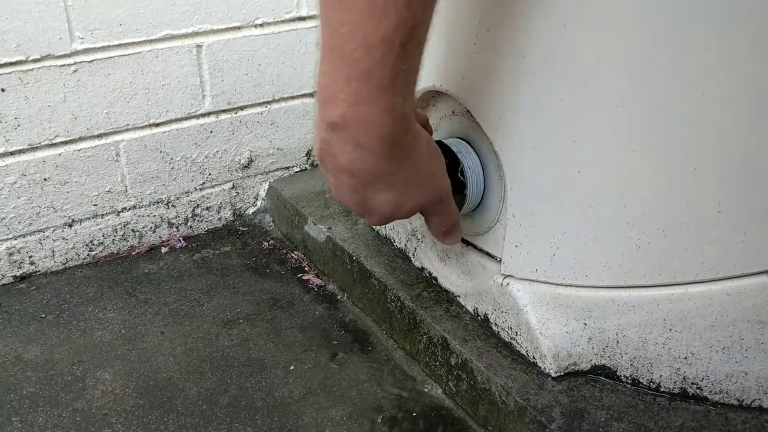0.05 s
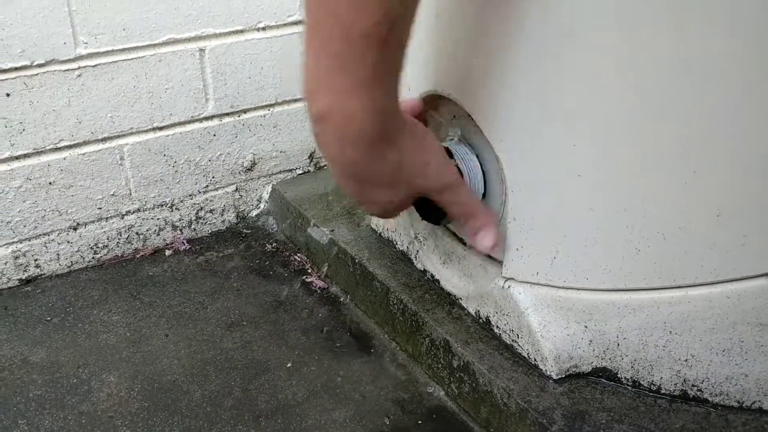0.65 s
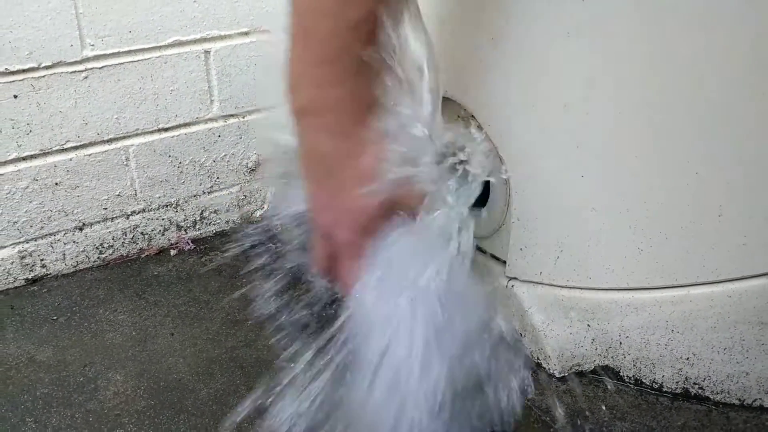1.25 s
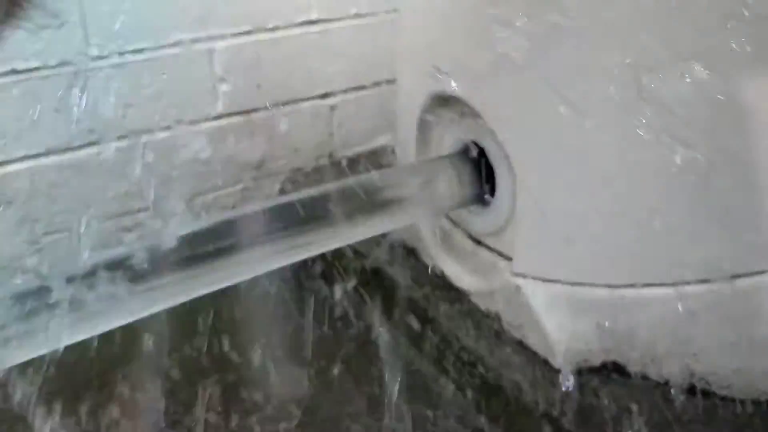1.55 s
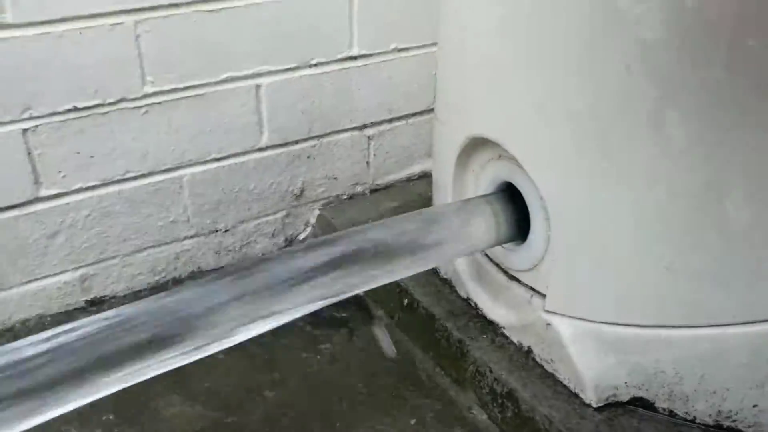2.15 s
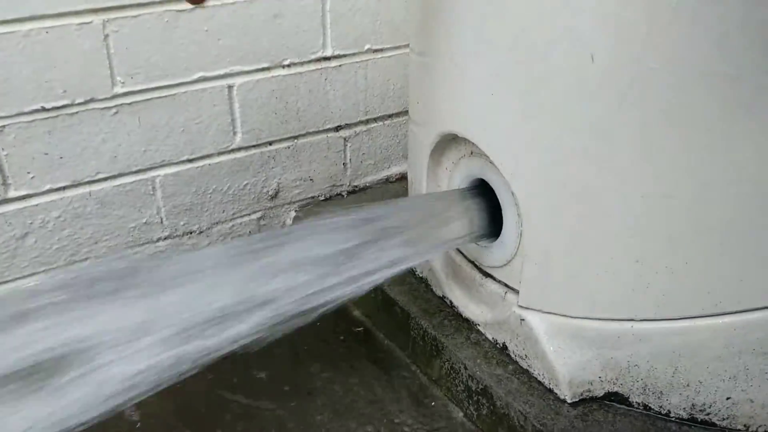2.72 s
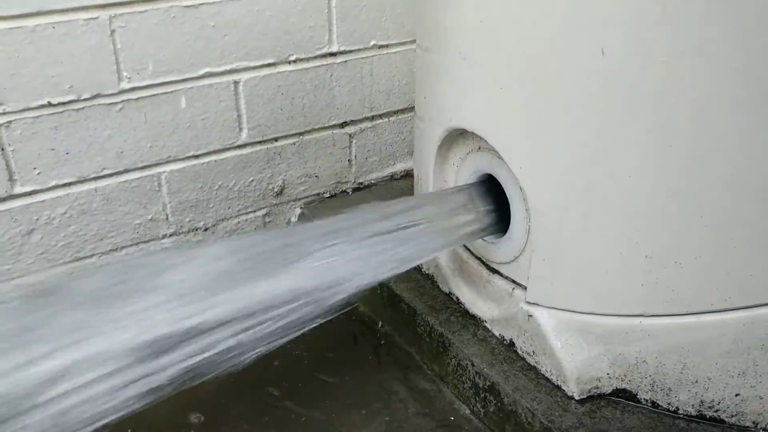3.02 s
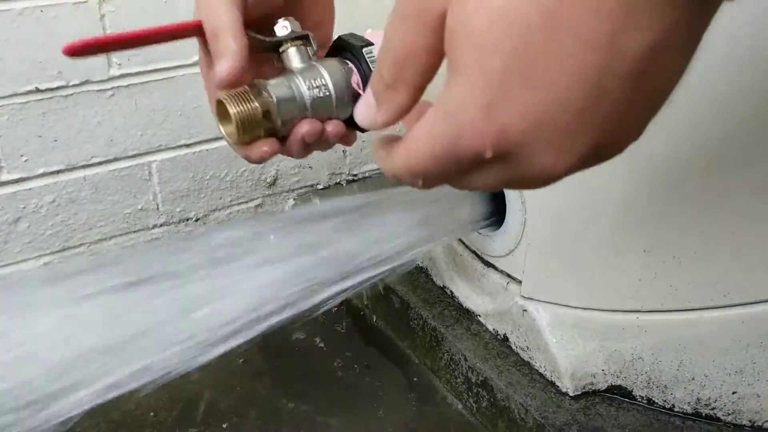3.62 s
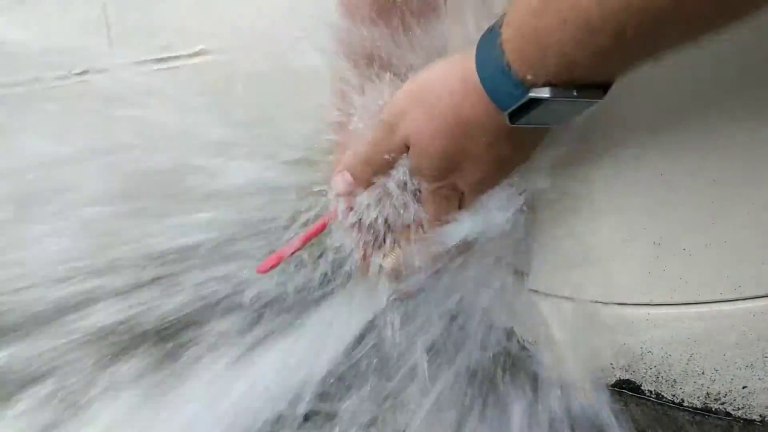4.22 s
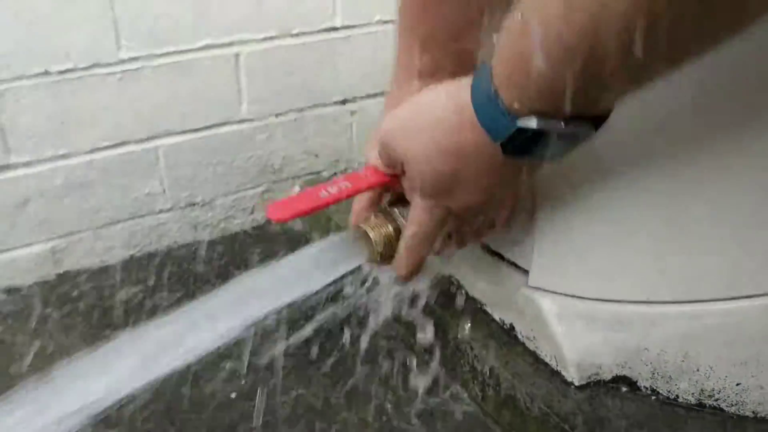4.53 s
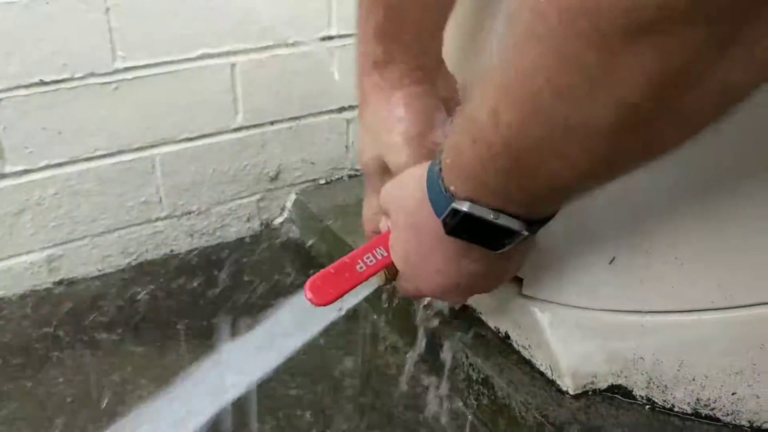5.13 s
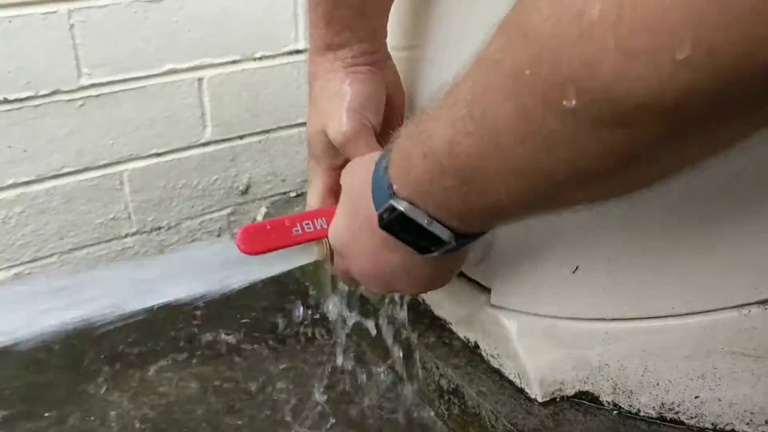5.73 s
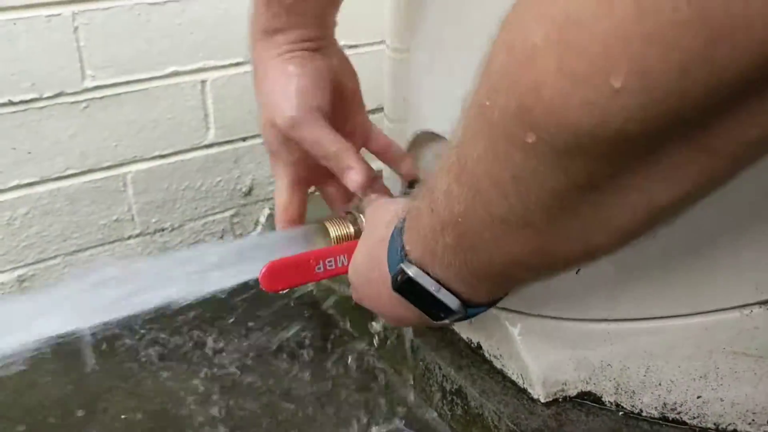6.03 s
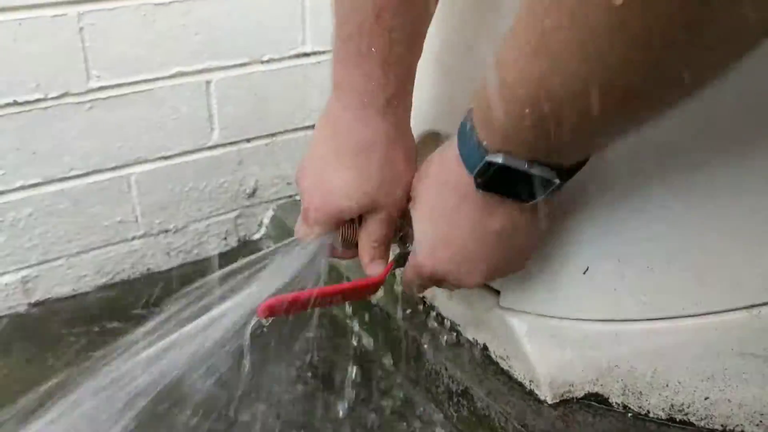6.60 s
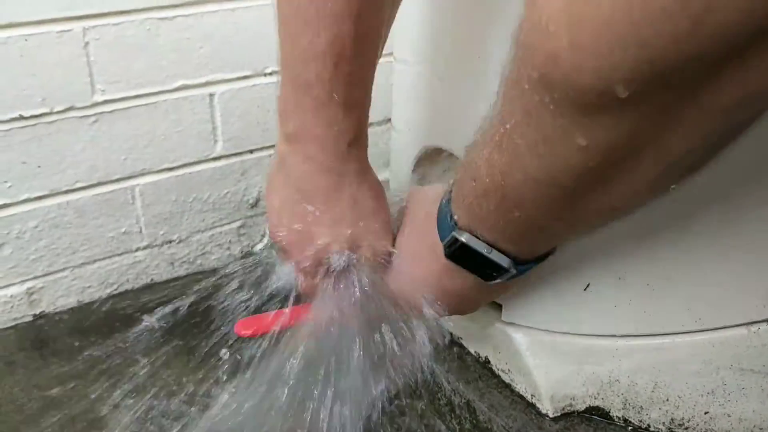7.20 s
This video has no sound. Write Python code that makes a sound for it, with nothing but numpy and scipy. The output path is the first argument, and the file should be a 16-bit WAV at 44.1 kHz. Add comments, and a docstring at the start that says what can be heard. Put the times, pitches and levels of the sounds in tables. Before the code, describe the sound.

The sound is outdoors, with the microphone close to a water tank's outlet and a faint rumble and hum behind. In the first half second a wet plastic plug gives a few small creaks, and thin squirts and sputtering hisses leak around it. At about 1.2 seconds it lets go in a bright burst of spray. Around 1.4 seconds water hits the microphone in a cluster of loud, thudding slaps, and everything afterwards sounds muffled and hollow. From 1.5 seconds a jet pounds wet concrete, growing stronger at about 2.3 seconds, with bubbling, fat nearby splats and occasional low gulps. Just after 4 seconds a valve pushed into the jet causes a strong surge of spray and deep gulping. The flow continues unevenly and gradually weakens, with spattering surges at about 6.2, 6.5, 6.9 and 7.2 seconds and a faint misty hiss.

```python
"""Outdoors at a full water tank, microphone close to the plug. The plug creaks and leaks as it is
unscrewed, and at 1.2 s lets go in a burst of spray. Around 1.4 s water slaps the microphone and
fills its port, so the water sounds muffled and hollow from there on. From 1.5 s the jet pounds wet
concrete, with low gulps and fat splats; from about 4 s a valve pushed into it breaks it into spray."""
import sys
import numpy as np
from scipy import signal
from scipy.fft import rfft, irfft
from scipy.io import wavfile

SR = 44100
rng = np.random.default_rng(int(sys.argv[2]) if len(sys.argv) > 2 else 0)


def transcribe(u):
    """Save the signal u as a 16-bit wav file named by the first command-line argument.

    u: samples, shape (n,) or (channels, n), limited to [-1, 1]; the rate is SR.
    q: integer samples, one column per channel.
    """
    v = np.clip(np.atleast_2d(u).T, -1, 1)
    q = np.round(v * 32767).astype(np.int16)
    wavfile.write(sys.argv[1], SR, q)


N = 320166
TIME = np.arange(N) / SR
HZ = np.fft.rfftfreq(4096, 1 / SR)  # the filter grid


# The jet runs clear, frays into a white gush, then is throttled by the valve:
# (time [s], pounding level [dB], plunge re pounding [dB], spatter re pounding [dB])
JET_FLOW = [(1.53, -37, -5.5, -7.5), (1.8, -34.5, -1, -8.5), (2.231, -35, -5, -8.5), (2.29, -23, -8, -16),
            (2.5, -23, -6.5, -16.5), (2.75, -26.5, -0.5, -12.5), (3.5, -25.5, 0.5, -12),
            (4.04, -24, -4, -15), (4.35, -22.5, -6.5, -11.5), (4.549, -29, -6.5, -7.5),
            (5.0, -22, -12, -12), (5.65, -29.5, -11.5, -9), (6.05, -30.5, -11, -9), (6.4, -37, -7.5, -7.5),
            (6.65, -35.5, -8.5, -4.5), (7.151, -39.5, -3.5, -5)]
# It surges or is briefly blocked: (start [s], length [s], change of pounding [dB], plunge [dB],
# spatter [dB])
JET_SURGES = [(2.3, 0.051, 0.5, 9.5, -2.5), (2.498, 0.069, 1.5, 5.5, 0.5), (3.58, 0.1, 3.5, -0.5, -0.5),
              (4.054, 0.217, 5, 4.5, 6.5), (5.034, 0.12, -4, -3, -0.5), (5.264, 0.064, -4.5, -3, -0.5),
              (5.746, 0.11, -7.5, -12, -1.5), (6.162, 0.11, 3.5, 4, 6.5), (6.451, 0.1, 1, 15.5, 7.5),
              (6.867, 0.078, 5.5, 6.5, 3), (7.178, .12, 4.5, 7, 9)]
# Its three voices out on the concrete, ahead of the port: (frequency [Hz], level [dB])
PLUNGE_SPECTRUM = [(40, -54), (120, -17), (220, -7.5), (350, -5), (600, 3.5), (950, 6.5), (1150, -9.5),
                   (1600, -28.5), (4000, -52)]
POUND_SPECTRUM = [(300, -52.5), (850, -16), (1200, 5), (1900, 1.5), (2400, -6), (4000, -15), (9000, -44)]
SPATTER_SPECTRUM = [(600, -27.5), (1600, -7), (2400, 2.5), (3200, -1.5), (16000, 7)]

def jet():
    """Lumps of water land on wet concrete: a hollow plunge, hard pounding, bubbles and fine spatter."""
    pound_db, plunge_db, spatter_db = curves(JET_FLOW)
    plunge_db, spatter_db = pound_db + plunge_db, pound_db + spatter_db
    for start, length, harder_db, deeper_db, finer_db in JET_SURGES:
        surge = gate(start, start + length, fade=0.015)
        pound_db += harder_db * surge
        plunge_db += deeper_db * surge
        spatter_db += finer_db * surge
    port = flooded_port()
    lumps = np.minimum(wander(hz=55), 1.5)  # all three voices swell together
    plunge_hits = drops(per_s=1500, spread_db=3.2, wash=0.4) * amp(1.2 * lumps + 1.5 * wander(hz=30))
    plunge = unit_rms(colour(plunge_hits, spectrum(PLUNGE_SPECTRUM) + port))
    pound_hits = drops(per_s=1600, spread_db=3, wash=0.71) * amp(2.2 * lumps)
    pound = unit_rms(colour(pound_hits, spectrum(POUND_SPECTRUM) + port))
    gurgle = unit_rms(colour(bubbles(per_s=420, low_hz=819, high_hz=2017), port))
    spatter_hits = drops(per_s=2200, spread_db=1, wash=0.99) * amp(1.5 * lumps)
    spatter = unit_rms(colour(spatter_hits, spectrum(SPATTER_SPECTRUM) + port))
    tinkle = unit_rms(colour(bubbles(per_s=160, low_hz=1787, high_hz=5900), port))
    coarse = 0.86 * pound + amp(-8) * gurgle
    fine = 0.85 * spatter + 0.5 * tinkle
    water = amp(pound_db) * coarse + amp(plunge_db) * plunge + amp(spatter_db) * fine
    return water * gate(1.5, 9, fade=0.036)


def bubbles(per_s, low_hz, high_hz, sizes=16):
    """Air trapped where the jet lands rings for a few cycles, barely rising in pitch."""
    out, t = np.zeros(N), TIME[:1024]
    for hz in np.geomspace(low_hz, high_hz, sizes):
        age = hz * t / 4.5  # in decay times of 4.5 cycles
        ring = np.exp(-age) * (1 - np.exp(-8 * age)) * np.sin(2 * np.pi * hz * t * (1 + 0.012 * age))
        births = rng.random(N) ** 2 * (rng.random(N) < per_s / sizes / SR)
        out += signal.oaconvolve(births, ring)[:N]
    return out


# Treble loss through the water in the port: (frequency [Hz], gain [dB])
PORT_MUFFLE = [(100, 0.5), (1600, -0.5), (2200, -4), (3000, -6.5), (3500, -11), (4000, -9.5), (4900, -12),
               (6000, -21.5), (8000, -34.5), (10000, -42.5), (15500, -55.5)]
# The port's resonances and notches: (frequency [Hz], width [Hz], gain [dB])
PORT_RESONANCES = [(920.5, 122, 8.5), (1120, 157, -9.5), (1423, 245, 12.5), (2140, 230, -2.5),
                   (2460, 65, 4.5)]

def flooded_port():
    """Water in the microphone port swallows the treble and rings at two main hollow pitches; in dB."""
    return spectrum(PORT_MUFFLE) + sum(db * bell(hz, width) for hz, width, db in PORT_RESONANCES)


# Fat splats, heard through the flooded port: (time [s], peak level [dB], centre [Hz], decay [s])
NEAR_SPLATS = [(1.706, -4.5, 1000, 0.0037), (1.764, -9, 1040, 0.0063), (1.8116, -17.5, 1710, 0.0093),
               (1.815, -19.5, 3670, 0.0075), (1.898, -17.5, 990, 0.0018), (1.965, -16, 1410, 0.0012),
               (2.264, -14, 1470, 0.0095), (2.288, -15, 1480, 0.0055), (2.431, -10, 1310, 0.0052),
               (3.546, -11, 647, 0.019), (3.621, -12, 1400, 0.012), (3.667, -8.5, 1340, 0.0083),
               (4.07, -7.5, 1400, 0.00081), (4.336, -10, 1400, 0.0046), (4.419, -21, 1400, 0.003),
               (4.454, -10.5, 960, 0.0048), (4.817, -12, 980, .0043), (4.953, -11.5, 1410, 0.0035),
               (5.059, -12.5, 1460, 0.0066), (5.09, -12, 1520, 0.007), (5.173, -14, 3040, .005),
               (5.44, -9, 1130, 0.0057), (5.455, -15, 815, 0.021), (5.573, -15.5, 1500, 0.0025),
               (5.836, -16.5, 1420, 0.0064), (5.901, -13.5, 1500, 0.0013), (6.01, -22, 930, 0.019),
               (6.485, -6, 3760, 0.00081), (6.509, -4, 1280, 0.00099), (6.5196, -7.5, 940, 0.001),
               (6.572, -19.5, 880, 0.0035)]

def splats():
    """Single splats near the microphone: short ones crack, longer ones are round plops."""
    out, port = np.zeros(N), flooded_port()
    jet_s, pound_db = np.transpose(JET_FLOW)[:2]
    stray_count, stray_hz, stray_decay_s = 10, 1400, 0.0023
    strays = []  # lesser splats fall at random and follow the force of the jet
    for when, size in rng.random((stray_count, 2)):
        s = jet_s[0] + when * (jet_s[-1] - jet_s[0])
        db = np.interp(s, jet_s, pound_db) + 11.5 + 4 * (2 * size - 1)
        strays.append((s, db, stray_hz, stray_decay_s))
    for s, db, hz, decay_s in NEAR_SPLATS + strays:
        band_db = 1.58 * hump(hz, sharpness=0.75 + 450 * decay_s)
        add(out, s, amp(db) * unit_peak(colour(impact(decay_s, scatter=0.9), band_db + port)))
    return out


# Sharp slaps of water close by: (time [s], ring level [dB], ring pitch [Hz], crack level [dB])
CLOSE_SLAPS = [(1.249, -18.5, 2890, -8.5), (1.3816, -4.5, 192, -6), (1.408, -4.5, 454, -3.5),
               (1.4117, -4, 970, -5), (1.430, -17, 1510, -3.5), (1.436, -1.5, 784, -11),
               (1.4458, -2, 125, -3), (1.453, -1.5, 776, -1), (1.460, -1.5, 720, -13),
               (1.468, -14, 390, -28), (1.474, -8.5, 101, -31), (1.4943, -3.5, 940, -13.5)]

def slaps():
    """First a splash off the hand, then water hitting the microphone; each cracks, rings and thuds."""
    flood_start_s, flood_length_s = 1.452, 0.013
    muffle, t = spectrum(PORT_MUFFLE), TIME[:8192]
    sheet = unit_rms(colour(rng.standard_normal(N), 4.9 * hump(166, sharpness=0.5) + muffle))
    out = amp(-18) * sheet * gate(1.425, 1.51, fade=0.02)  # buffeting under the later slaps
    thud = amp(-12.5 - 60 * t / 0.17) * np.sin(2 * np.pi * 55 * t)
    for s, db, hz, crack_db in CLOSE_SLAPS:
        decay_s = 0.0028 + 0.66 / hz  # low rings last longer
        ring = np.sin(2 * np.pi * hz * t) * np.exp(-t / decay_s) * (1 - np.exp(-t / 0.0004))
        filled = np.clip((s - flood_start_s) / flood_length_s, 0, 1)  # cracks dull as the port fills
        band_db = 2.15 * hump(1240, sharpness=0.94) + (0.2 + 0.8 * filled) * muffle
        crack = unit_peak(colour(impact(decay_s=0.0021, scatter=1.8), band_db))
        add(out, s, amp(db) * (ring + thud) + amp(crack_db) * crack)
    return out


# The plug lets go: (time [s], spray level [dB], splash re spray [dB])
BURST_LEVELS = [(1.168, -43, -15), (1.183, -35, -14), (1.24, -28.5, -4), (1.26, -26, 2.5),
                (1.31, -22.5, 0.5), (1.382, -19.5, -11)]
# The last turns give way and spray hits the hand: (time [s], spray boost [dB], extra splash boost [dB])
BURST_KICKS = [(1.199, 16, -10), (1.227, 16.5, 1.5), (1.247, 12, 3)]
# Spray in the air and splash off the hand: (frequency [Hz], level [dB])
SPRAY_SPECTRUM = [(1200, -4.5), (2500, -4), (5300, 3.5), (8000, -2), (13000, -1.5), (16000, -6.5)]
SPLASH_SPECTRUM = [(60, 3), (350, -17), (530, 4), (700, 1), (1100, 6), (1600, 10.5), (2300, 6.5),
                   (4000, 1.5), (9000, -48)]

def burst():
    """At close range, bright spray fans out round the plug and splashes off the hand."""
    rise_s, decay_s = 0.002, 0.0081
    spray_db, splash_db = curves(BURST_LEVELS)
    for s, spray_boost_db, splash_boost_db in BURST_KICKS:
        age = np.maximum(TIME - s, 0)
        kick = np.minimum(age / rise_s, 1) * np.exp(-age / decay_s)
        spray_db += spray_boost_db * kick
        splash_db += splash_boost_db * kick
    spray = unit_rms(colour(drops(per_s=5400, spread_db=7, wash=1.04), spectrum(SPRAY_SPECTRUM)))
    splash = unit_rms(colour(drops(per_s=3000, spread_db=2.5, wash=0.8), spectrum(SPLASH_SPECTRUM)))
    covered_db = -17 * np.clip((TIME - 1.381) / 0.0053, 0, 1)  # the first water covers the port
    level = amp(spray_db + covered_db + 0.8 * wander(hz=60)) * gate(1.165, 1.465, fade=0.0089)
    return level * (spray + amp(splash_db) * splash)


# Low gulps of air and water: (time [s], throb peak level [dB], pitch [Hz], time to fall 60 dB [s])
AIR_POCKETS = [(1.77, -31, 114, 0.12), (3.44, -21.5, 214, 0.21), (3.445, -18.5, 396, 0.089),
               (3.665, -28.5, 68, 0.1), (4.201, -24.5, 273.7, 0.42), (4.241, -16.5, 130, 0.16),
               (4.294, -19.5, 109.3, 0.29), (4.375, -31, 106, 0.38), (4.815, -22, 119, 0.025),
               (5.644, -30, 200, 0.06), (5.711, -32, 111.6, 0.24), (6.415, -28.5, 139, 0.15),
               (6.49, -31, 102, 0.14)]

def gulps():
    """Large pockets of air throb briefly at an unsteady pitch while the water churns round them."""
    out, t = np.zeros(N), TIME[:8192]
    wobble = 1 + 0.13 * wander(hz=70)
    for s, db, hz, t60 in AIR_POCKETS:
        cycles = np.cumsum(hz * wobble[round(s * SR):][:len(t)]) / SR
        throb = (1 - np.exp(-t / 0.0019)) * amp(-60 * t / t60) * np.sin(2 * np.pi * cycles)
        band_db = 2 * hump(1.52 * hz, sharpness=1.25) + spectrum(PORT_MUFFLE)
        churn = colour(impact(t60 / 7, scatter=4), band_db)
        add(out, s, amp(db) * (unit_peak(throb) + amp(-5) * unit_peak(churn)))
    return out


# The plastic plug's resonances: (frequency [Hz], relative level [dB], time to fall 60 dB [s])
PLUG_MODES = [(453, 3.5, 0.018), (1140, 11, 0.0025), (2400, -3, 0.0098), (3020, 1, 0.0099),
              (5640, -12, .018), (8140, -1.5, 0.017), (10800, -13, .012)]
# Slips of the thread: (time [s], peak level [dB])
THREAD_SLIPS = [(.003, -27), (0.019, -31), (0.344, -34), (0.367, -29), (0.374, -29), (.386, -32),
                (.391, -25.5), (0.405, -25.5), (.417, -28)]
# Small squirts at the plug: (time [s], peak level [dB], starting pitch [Hz], length [s])
PLUG_SQUIRTS = [(0.519, -37.5, 5320, 0.019), (0.532, -39.5, 7730, 0.024), (0.798, -34.5, 10160, 0.0065)]

def plug():
    """Close by, the wet thread sticks and slips in creaks, and squirts whistle with falling pitch."""
    out, t = np.zeros(N), TIME[:3000]
    ring = sum(amp(db - 60 * t / t60) * np.sin(2 * np.pi * hz * t) for hz, db, t60 in PLUG_MODES)
    ring[0] += 9  # the bare click of the slip
    for s, db in THREAD_SLIPS:
        add(out, s, amp(db) * unit_peak(signal.oaconvolve(impact(decay_s=0.0049, scatter=2), ring)))
    for s, db, hz, length in PLUG_SQUIRTS:
        rasp = 1 + 32 * length * rng.standard_normal(len(t))  # longer squirts rasp more
        pitch = hz * (0.55 + 0.45 * np.exp(-t / length)) * rasp
        swell = t * np.exp(-2.5 * (t / length) ** 2)
        add(out, s, amp(db) * unit_peak(swell * np.sin(2 * np.pi * np.cumsum(pitch) / SR)))
    return out


# Water seeping along the thread: (time [s], level [dB])
SEEP_LEVELS = [(0, -54), (.18, -67), (.2, -67), (.32, -94), (.36, -53), (.6, -66.5), (.82, -61),
               (1.15, -57)]
# Spurts as the plug loosens: (start [s], end [s], level [dB], centre [Hz])
LEAK_SPURTS = [(.057, .128, -54, 5200), (0.113, 0.186, -44.5, 12100), (.835, .876, -41.5, 7500),
               (.836, 1.137, -45, 10200)]
# The leak's bright hiss: (frequency [Hz], level [dB])
LEAK_SPECTRUM = [(1000, -32), (2200, -2), (4000, -2), (6000, -1.5), (12000, -0.5), (16000, -6.5)]

def leak():
    """Water sputters and hisses round the loose plug while the microphone is still dry."""
    leak_db = spectrum(LEAK_SPECTRUM)
    seep = unit_rms(colour(drops(per_s=450, spread_db=5, wash=0.7), leak_db))
    out = amp(curves(SEEP_LEVELS)[0] + 4.4 * wander(hz=70)) * seep * gate(-1, 1.18, fade=0.01)
    for start, end, db, hz in LEAK_SPURTS:
        for band_hz in (hz / 1.25, hz * 1.25):  # two bands swell independently, so the colour shifts
            droplets = drops(per_s=4400, spread_db=2, wash=0.97)
            hiss = unit_rms(colour(droplets, hump(band_hz, sharpness=1.4) + leak_db))
            out += amp(db + 1.7 * wander(hz=45)) * hiss * gate(start, end, fade=0.0085) / np.sqrt(2)
    return out


# Spells of mist off the valve: (start [s], end [s], level [dB])
MIST_SPELLS = [(4.06, 4.45, -56), (6.815, 7.0, -50), (7.133, 7.4, -54)]

def mist():
    """The valve breaks the jet into fine droplets, a faint hiss behind the pounding."""
    level = sum(amp(db) * gate(start, end, fade=0.14) for start, end, db in MIST_SPELLS)
    return level * unit_rms(colour(drops(per_s=3000, spread_db=3, wash=0.76), hump(6000, sharpness=1.5)))


# Outdoor ambience round the tank: (frequency [Hz], relative level [dB])
YARD_SPECTRUM = [(20, -26), (40, -8.5), (60, -3), (85, -0.5), (120, -8), (170, -11), (250, -12), (400, -20),
                 (900, -20), (1500, -26), (3000, -40.5), (6000, -41), (16000, -49.5)]
# A faint hum: (frequency [Hz], rms level [dB])
HUM_TONES = [(59.2, -48.5), (565, -60)]

def yard():
    """Distant rumble and a wavering hum."""
    hum = sum(amp(db) * np.sqrt(2) * np.sin(2 * np.pi * hz * TIME + wander(hz=4)) for hz, db in HUM_TONES)
    return amp(-45) * unit_rms(colour(rng.standard_normal(N), spectrum(YARD_SPECTRUM))) + hum


def drops(per_s, spread_db, wash):
    """Impacts of widely varying size over a wash of countless tiny ones."""
    size = amp(spread_db * np.minimum(rng.exponential(1, N), 4))
    hits = size * rng.choice([-1, 1], N) * (rng.random(N) < per_s / SR)
    return unit_rms(unit_rms(hits) + wash * rng.standard_normal(N))


def impact(decay_s, scatter):
    """A push followed by a dying scatter of droplets."""
    t = TIME[:8192]
    push = scatter * rng.standard_normal(len(t)) * np.exp(-t / decay_s) / np.sqrt(decay_s * SR / 2)
    push[0] += 1
    return push


def wander(hz):
    """Random drift of rms 1, up to about hz changes a second."""
    f = np.fft.rfftfreq(N, 1 / SR)
    return unit_rms(irfft(rfft(rng.standard_normal(N)) * f / (f + hz / 4) / (1 + (f / hz) ** 4), N))


def colour(x, db):
    """Causal filter with the given gain curve."""
    log_gain = np.log(amp(np.concatenate([db, db[-2:0:-1]])))
    taps = np.fft.ifft(np.exp(np.conj(signal.hilbert(log_gain)))).real
    return signal.oaconvolve(x, taps)[:len(x)]


def spectrum(points):
    """A table's gain curve in dB on the filter grid."""
    hz, db = np.transpose(points)
    return np.interp(np.log(HZ + 1), np.log(hz + 1), db)


def hump(hz, sharpness):
    """A broad band around hz, in dB."""
    return -10 * np.log10(1 + (sharpness * np.log2((HZ + 1) / hz)) ** 2)


def bell(hz, width):
    """Shape of one resonance, 1 at its centre."""
    return 1 / (1 + (2 * (HZ - hz) / width) ** 2)


def curves(rows):
    """Each column after the first as a curve in time."""
    s, *columns = np.transpose(rows)
    return [np.interp(TIME, s, column) for column in columns]


def gate(start, end, fade):
    """Open from start to end, with soft edges."""
    return np.clip((TIME - start) / fade, 0, 1) * np.clip((end - TIME) / fade, 0, 1)


def add(mix, s, sound):
    """Mixes a sound in at time s."""
    part = mix[max(round(s * SR), 0):][:len(sound)]
    part += sound[:len(part)]


def amp(db):
    """Decibels to gain."""
    return 10 ** (np.asarray(db) / 20)


def unit_rms(x):
    """Scales to rms 1."""
    return x / np.sqrt(np.mean(x ** 2) + 1e-20)


def unit_peak(x):
    """Scales to peak 1."""
    return x / (abs(x).max() + 1e-20)


def scene():
    """All sources at the one microphone beside the tank."""
    return (yard() + leak() + plug() + burst() + slaps() + jet() + mist() + splats() + gulps())[None]


def record(dry):
    """Low cut; the loudest slaps overload the input; then the band limit."""
    low_cut_hz, ceiling, band_limit_hz = 36, 0.63, 15900
    dry = signal.sosfilt(signal.butter(2, low_cut_hz, "highpass", fs=SR, output="sos"), dry)
    limited = dry / (1 + (dry / ceiling) ** 16) ** (1 / 16)
    lowpass = signal.firwin(511, band_limit_hz, window=("kaiser", 9), fs=SR)
    return signal.oaconvolve(limited, lowpass[None], "same")


dry = scene()
out = record(dry)
transcribe(out)
```